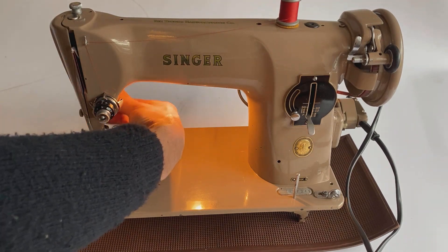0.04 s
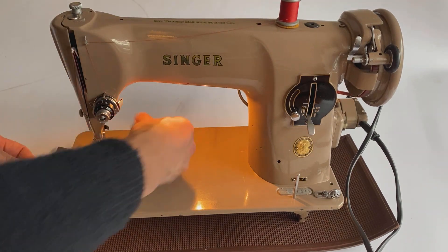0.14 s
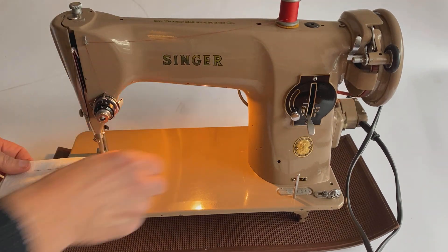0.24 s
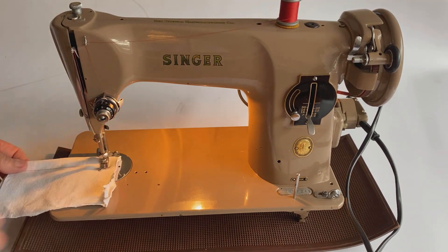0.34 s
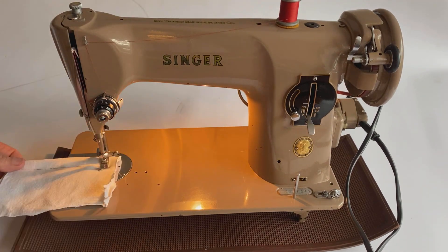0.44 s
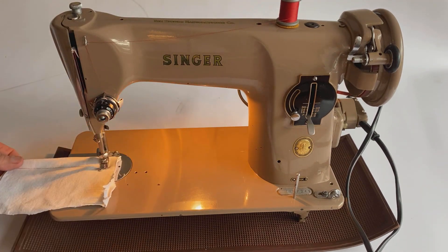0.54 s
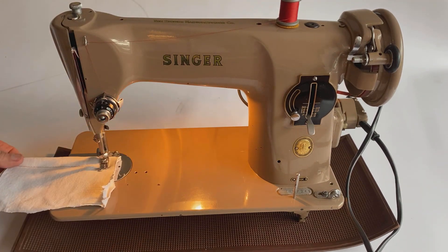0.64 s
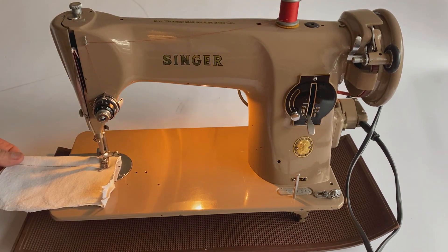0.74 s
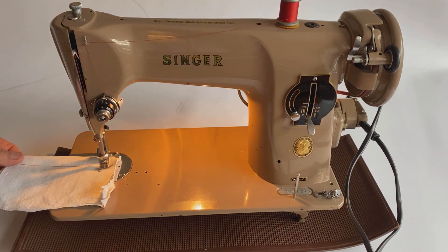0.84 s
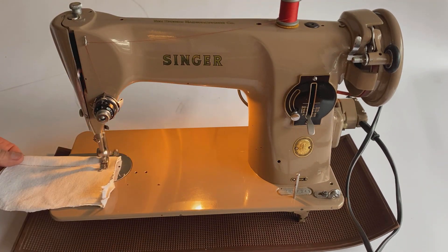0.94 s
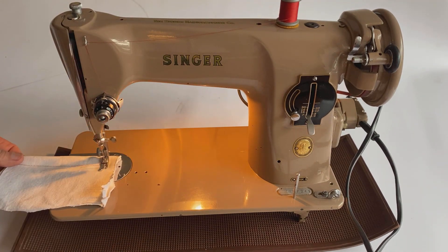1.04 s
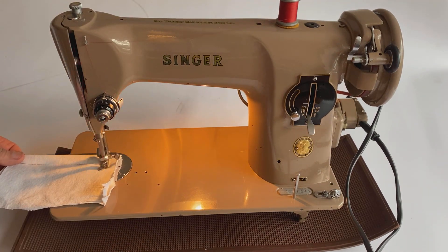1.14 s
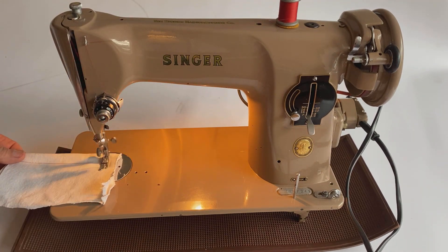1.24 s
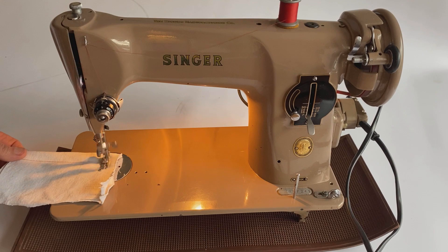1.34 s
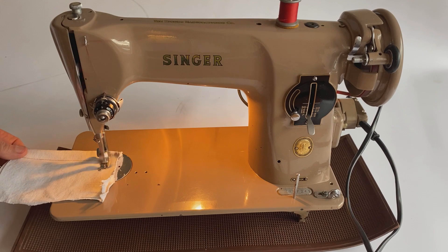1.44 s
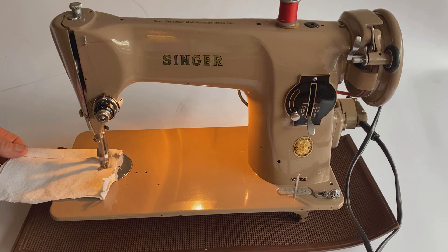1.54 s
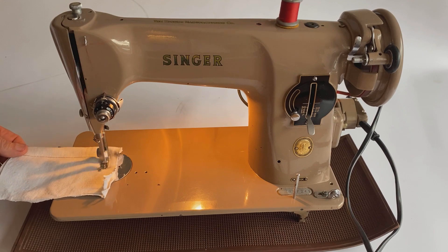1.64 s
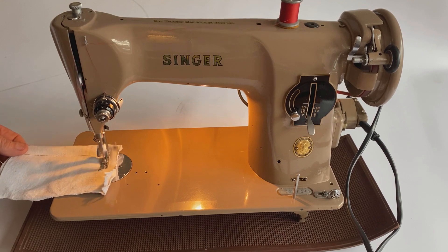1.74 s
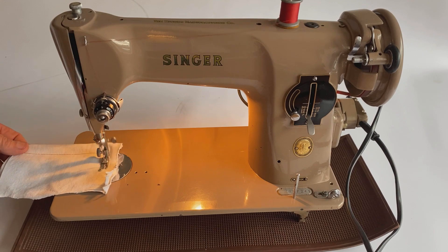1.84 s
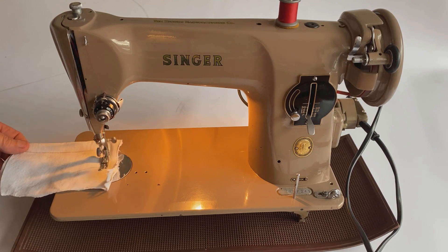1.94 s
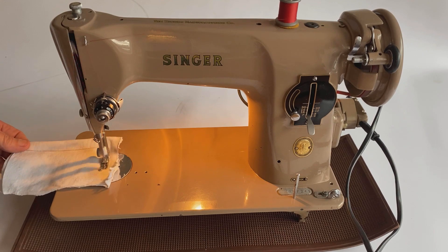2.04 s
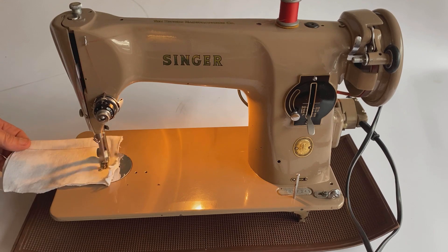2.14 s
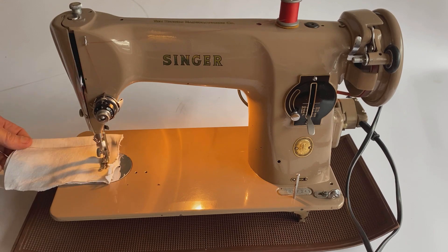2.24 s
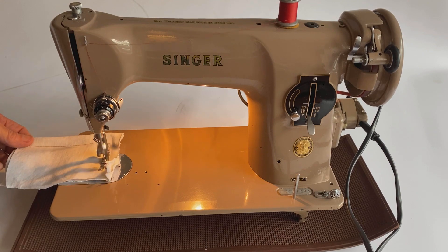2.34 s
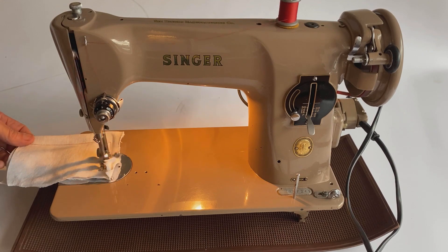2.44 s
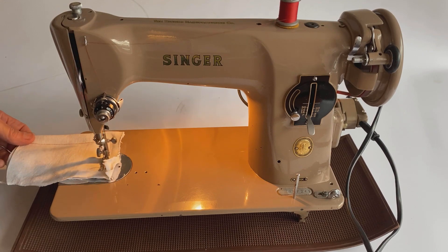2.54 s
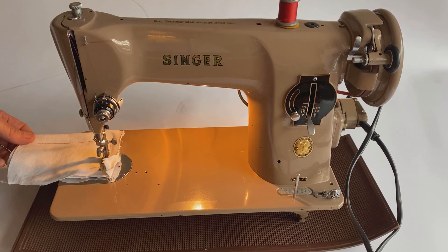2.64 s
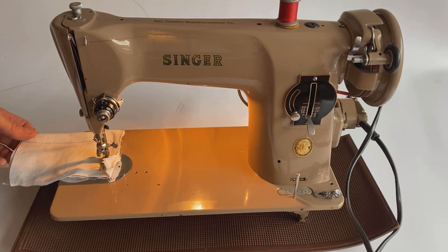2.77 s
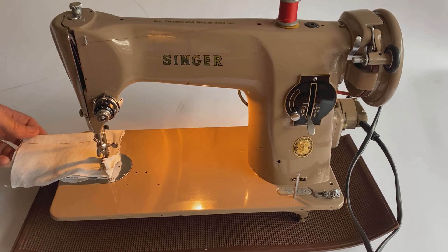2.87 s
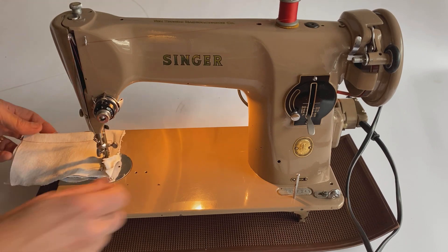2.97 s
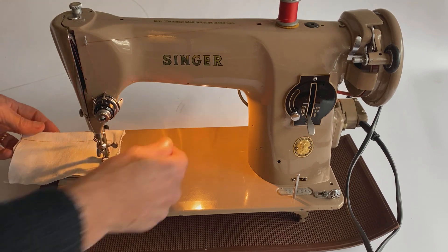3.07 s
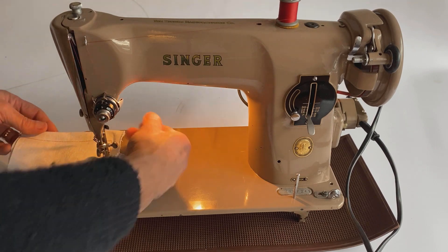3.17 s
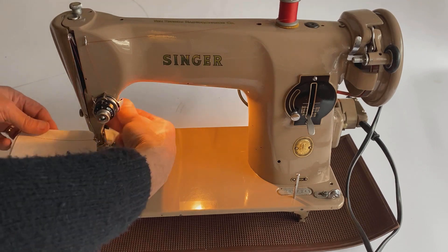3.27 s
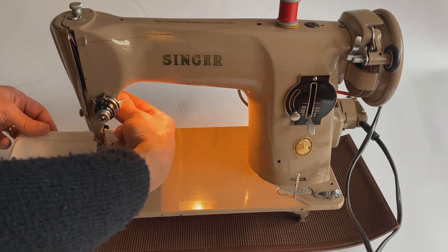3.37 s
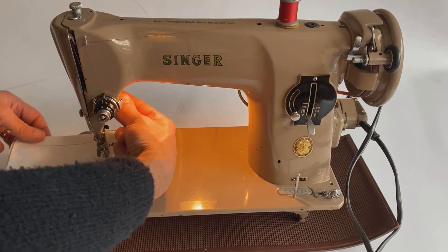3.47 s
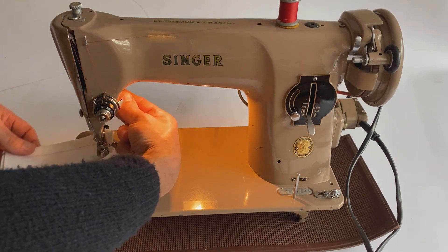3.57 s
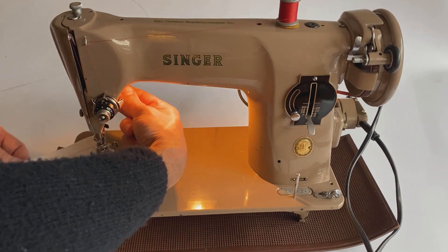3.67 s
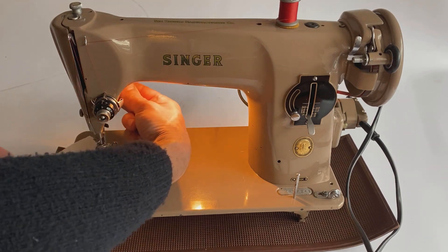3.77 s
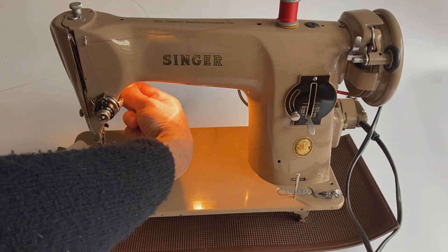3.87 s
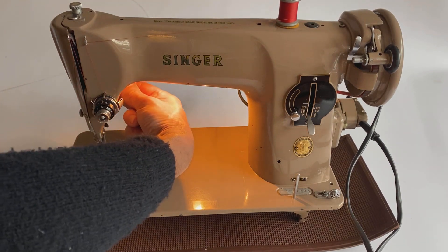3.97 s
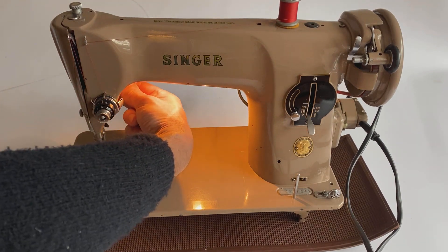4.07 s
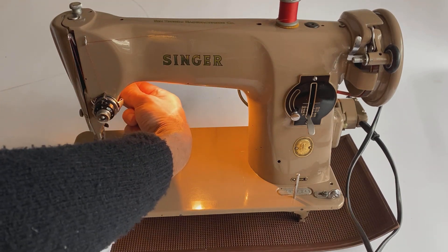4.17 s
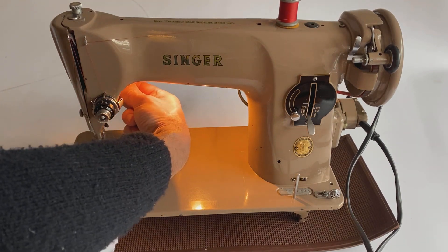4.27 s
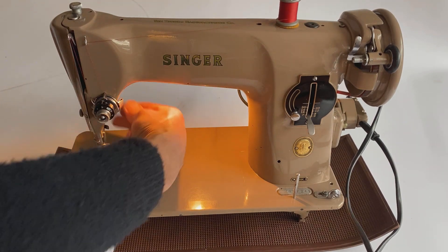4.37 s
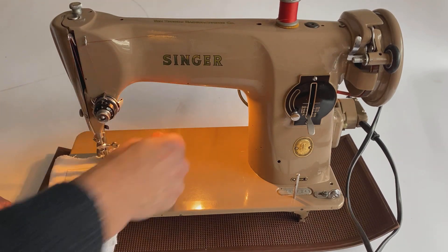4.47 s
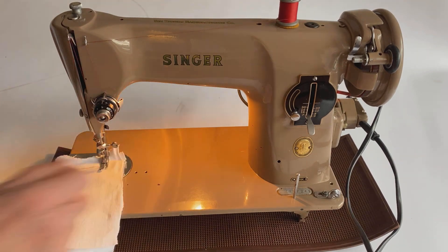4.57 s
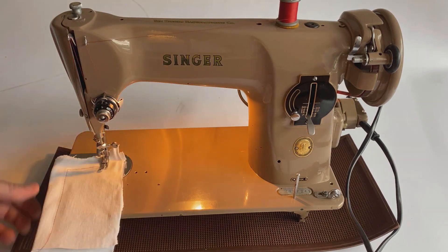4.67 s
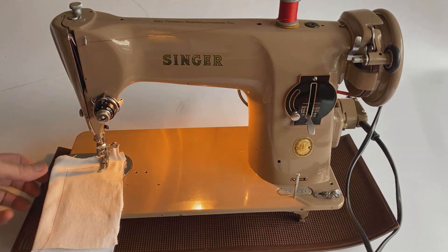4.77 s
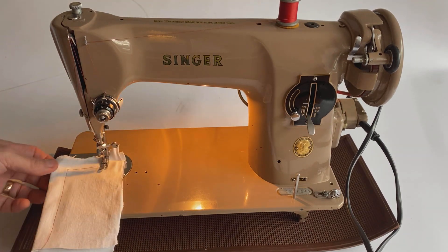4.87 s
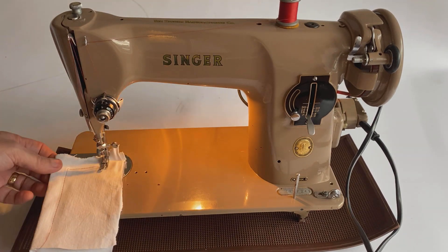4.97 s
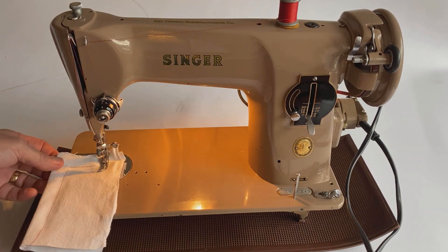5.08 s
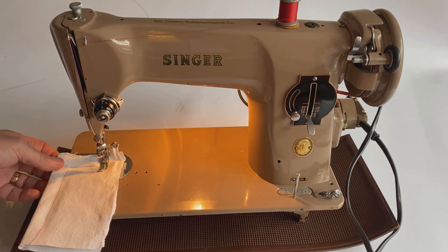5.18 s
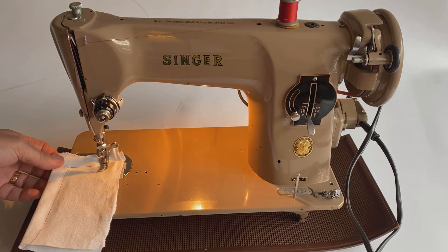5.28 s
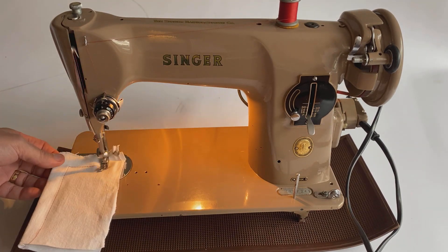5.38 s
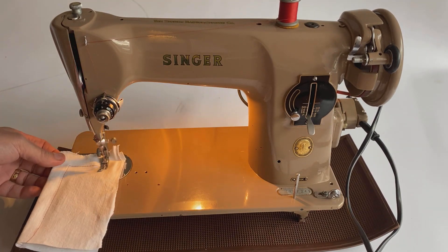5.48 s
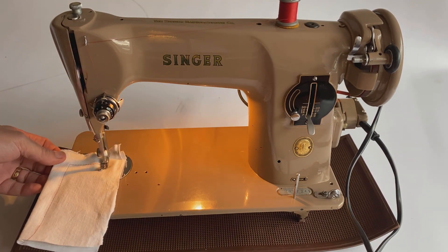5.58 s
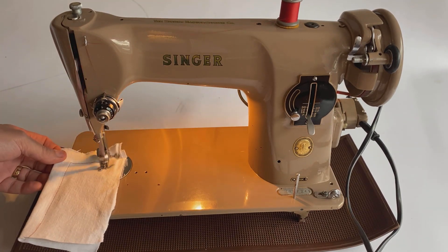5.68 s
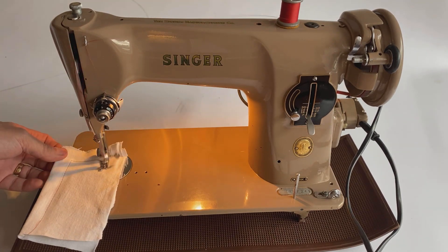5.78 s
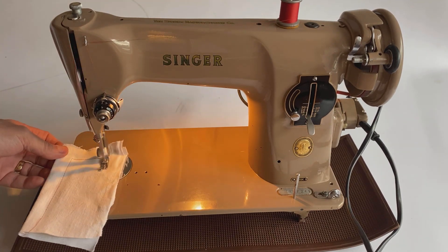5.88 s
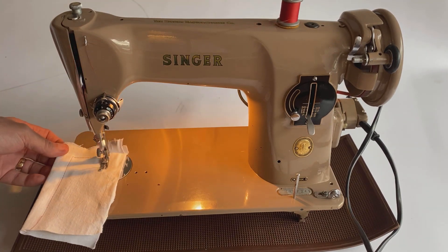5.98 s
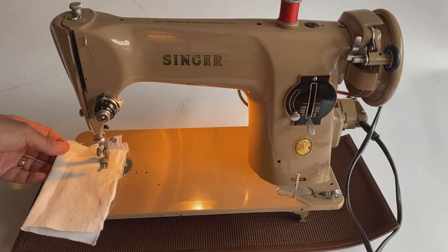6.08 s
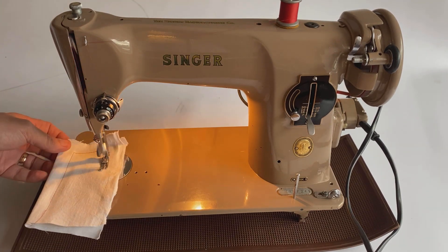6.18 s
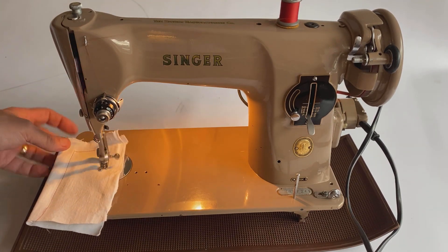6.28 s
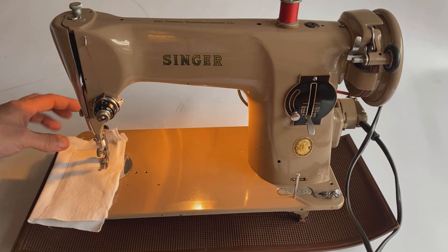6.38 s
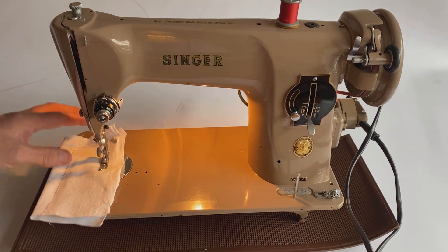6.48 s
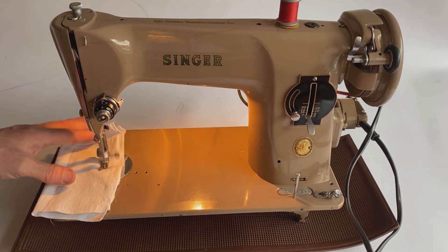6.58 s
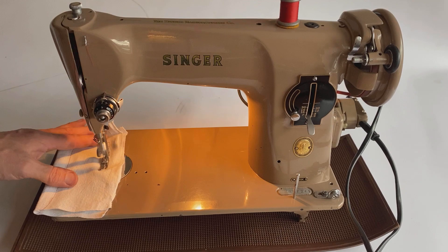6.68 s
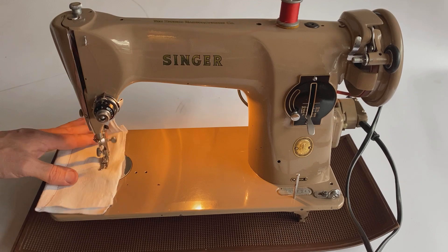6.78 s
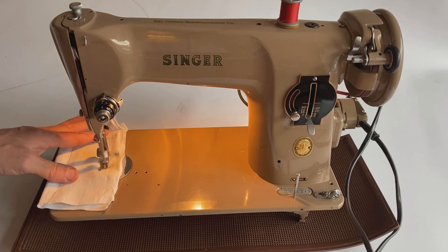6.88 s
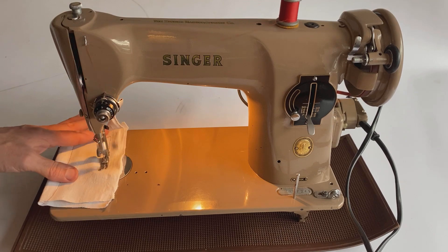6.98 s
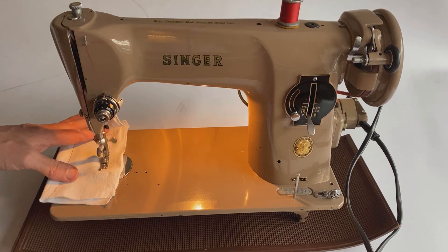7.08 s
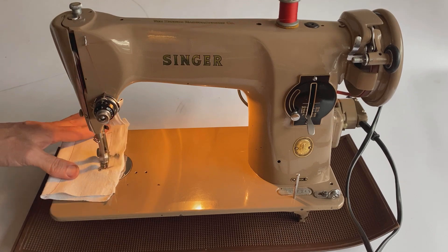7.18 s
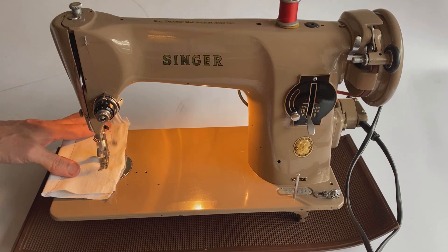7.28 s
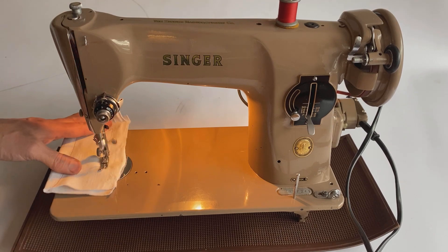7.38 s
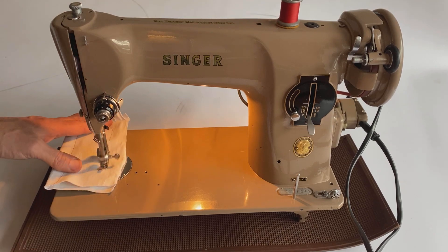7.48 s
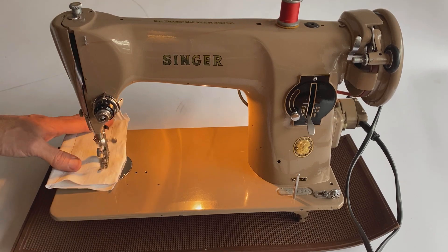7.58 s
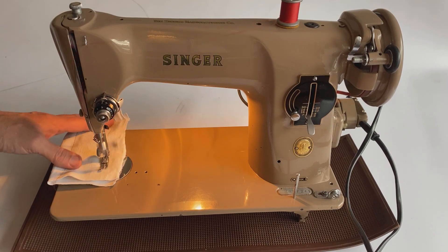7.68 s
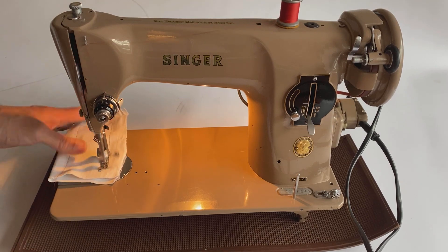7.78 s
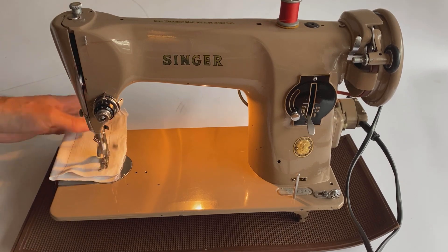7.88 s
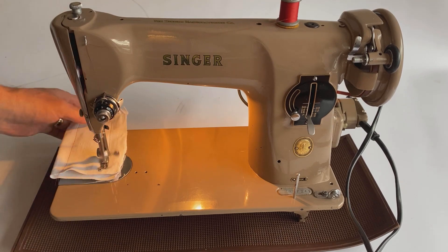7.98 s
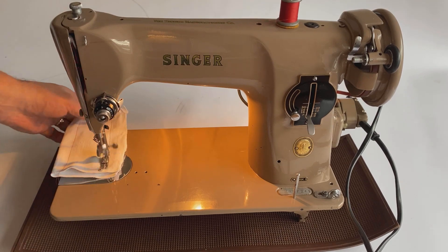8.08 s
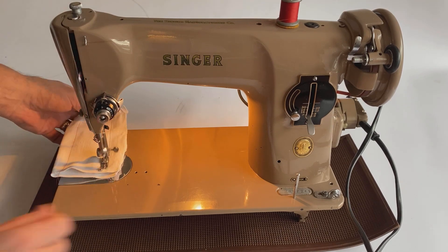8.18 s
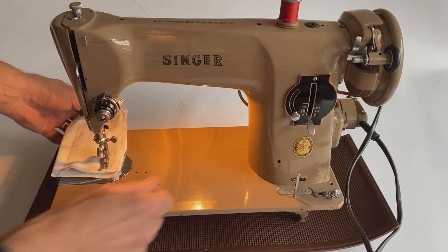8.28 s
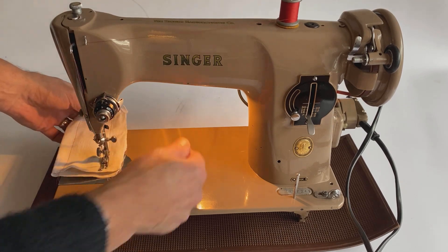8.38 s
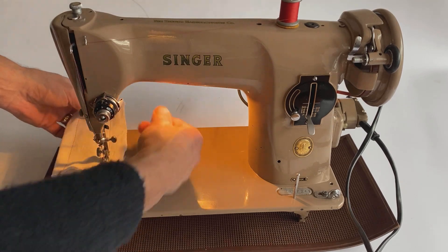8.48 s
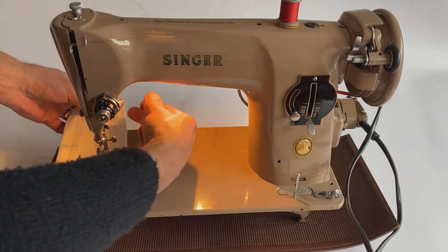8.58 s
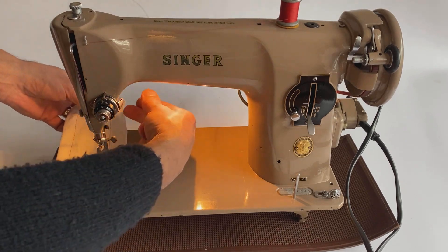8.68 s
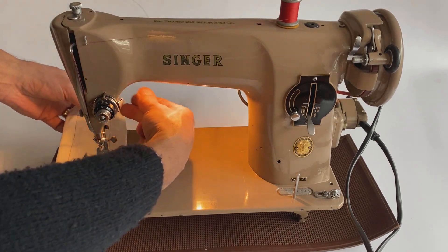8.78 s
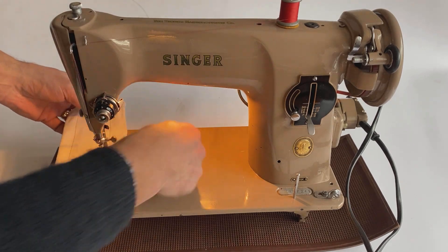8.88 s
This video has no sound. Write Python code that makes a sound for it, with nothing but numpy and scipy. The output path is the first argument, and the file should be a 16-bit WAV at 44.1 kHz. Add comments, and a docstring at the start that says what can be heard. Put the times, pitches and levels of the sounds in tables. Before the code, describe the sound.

Close stereo pickup of a metal sewing machine on a table in a small, slightly live room. Two bursts of about thirteen stitches per second, each starting with a growling motor rise and stopping with a hard switch crack and short coasting slowdown. Between them come near-quiet, soft fabric strokes, light metal taps and a dull pedal click over a faint low drone.

```python
"""An old electric sewing machine sews two short seams on a table in a small room, heard at two close ports.
A hand bumps the machine and the presser foot pings; the foot switch clicks and the motor creeps, then spins up.
At about 13 stitches a second, thread ticks and needle thumps recur with the shaft under a rattle of linkage, a hum
of frame and table and a whirr of brushes; the switch opens and the machine coasts to rest. A hand then works the
presser-foot lever and turns the cloth; a second seam and last strokes of cloth follow. Impacts ring damped modes."""
import sys
import numpy as np
from scipy import signal
from scipy.fft import rfft, irfft, next_fast_len
from scipy.io import wavfile
from scipy.ndimage import uniform_filter1d

SR = 44100
rng = np.random.default_rng(int(sys.argv[2]) if len(sys.argv) > 2 else 0)


def int16_out(signal):
    """Quantize to a 16-bit WAV file."""
    q = np.round(np.clip(np.atleast_2d(signal).T, -1, 1) * 32767)
    wavfile.write(sys.argv[1], SR, q.astype(np.int16))


N = 393372
TIME = np.arange(N) / SR
START_S = .1  # time constant with which the motor reaches creep speed

# one row a seam: (switch on [s], pedal pressed down [s], switch off [s], standstill [s],
# creep rate [stitches/s], top rate [stitches/s], spin-up [s], shaft angle at rest [turns], rattle build-up [s])
SEAMS = [(.83, 1.3576, 2.283, 2.88, 5.807, 12.795, .2787, .556, .26),
         (5.32, 5.605, 7.842, 8.5, 7.312, 13.521, .3604, .611, .08)]
# modes of table and bed under a blow: (frequency [Hz], relative level [dB], t60 [s])
TABLE = [(55.6, -21, 0.1), (70.6, -16, 0.14), (98, -31.5, 0.11), (133.6, -8, 0.32), (141.4, -1, 0.43),
         (178.6, -2, 0.22), (242.5, -7.5, 0.22), (235.6, -6, 0.56), (253.5, -12, 0.42),
         (364.3, -18.5, 0.73)]
# spectrum of rattling metal: (frequency [Hz], relative level [dB])
RATTLE = [(250, -17), (420, -0.5), (520, -3.5), (760, 2.5), (950, 0.5), (1080, 3), (1250, -2), (1450, 6),
          (1800, 2), (2030, 3), (2350, -0.5), (3000, -3), (3400, -5.5), (6800, -6), (10000, -27),
          (16000, -49)]
# spectrum of sliding parts and fizzing cloth: (frequency [Hz], relative level [dB])
HISS = [(1500, -17.5), (4000, -16.5), (7000, 0.5), (9500, 0), (12500, 7.5), (14000, 2.5), (15700, -9)]
# spectrum of thread snaps: (frequency [Hz], relative level [dB])
TICK = [(2000, -11), (4500, 1), (7000, 0), (10000, -0.5), (12000, 2.5), (13500, 8.5), (15500, -13.5)]
# spectrum of rubbing: (frequency [Hz], relative level [dB])
RUB = [(300, 16), (700, 0.5), (1500, 0), (3500, -6.5), (7000, -8.5), (11000, -14.5)]


def gain_of(db):
    """Decibels to amplitude."""
    return 10 ** (np.asarray(db) / 20)


def evened(x):
    """Scales to an rms of 1."""
    return x / np.sqrt(np.mean(x ** 2) + 1e-20)


def read(points, hz):
    """Interpolates a table on a log-frequency axis."""
    f, value = np.transpose(points)
    return np.interp(np.log(hz + 1), np.log(f + 1), value)


def add(mix, s, sound):
    """Superposes a sound on a mix at a time in seconds."""
    part = mix[max(round(s * SR), 0):][:len(sound)]
    part += sound[:len(part)]


def colour(x, spectrum, size=4096):
    """Minimum-phase filter of unit energy: the Hilbert transform of the log gain gives the phase."""
    log_gain = np.log(gain_of(read(spectrum, abs(np.fft.fftfreq(size, 1 / SR)))))
    response = np.exp(np.conj(signal.hilbert(log_gain)))
    taps = np.fft.ifft(response).real[:size // 2]
    return signal.oaconvolve(x, taps / np.linalg.norm(taps))[:len(x)]


def ring(modes, contact_s):
    """Modal decay after a blow, peak 1; a long, soft contact swells slowly and leaves the high modes out."""
    t = np.arange(SR // 2) / SR
    sound = np.zeros(len(t))
    for hz, db, t60 in modes:
        decay = gain_of(db + rng.standard_normal() - 60 * t / t60)  # each blow varies the mode levels
        sound += decay * np.sin(2 * np.pi * hz * t) / (1 + (hz * contact_s) ** 5)
    sound *= 1 - np.exp(-t / contact_s)
    return sound / abs(sound).max()


def burst(decay_s):
    """Noise under an exponential decay: a puff of micro-impacts."""
    t = np.arange(SR // 8) / SR
    return rng.standard_normal(len(t)) * np.exp(-t / decay_s)


def grains(per_s, spread_db):
    """Shot noise: random impacts of uneven size, rms 1."""
    hit, size = rng.random(N) < per_s / SR, rng.standard_normal(N)
    sign = np.sign(rng.standard_normal(N))
    return evened(hit * sign * gain_of(spread_db * np.clip(size, -2, 2)))


def wobble(size):
    """Low-passed noise, rms 1, smoothed twice over the given number of samples."""
    return evened(uniform_filter1d(uniform_filter1d(rng.standard_normal(N), size), size))


def swell(s, length_s):
    """Gaussian rise and fall around a time, peak 1."""
    return np.exp(-(2 * (TIME - s) / length_s) ** 2)


def shaft():
    """Integrates the stitch rate to shaft turns; also gives speed (1 = full), coasting and rattle build-up (0-1)."""
    full_speed = 13  # stitches/s at which the levels of speed-driven parts are given
    coast_power = 1.3  # friction bends the run-down by this power
    speed, turns, coasting, built = np.zeros((4, N))
    for on, pedal, off, stop, creep, top, spin_up_s, angle, build_s in SEAMS:
        powered = np.clip(TIME, on, off)
        rate = creep * (1 - np.exp((on - powered) / START_S))
        rate += (top - creep) * (1 - np.exp(np.minimum(pedal - powered, 0) / spin_up_s))
        rate *= np.clip((stop - TIME) / (stop - off), 0, 1) ** coast_power
        since = TIME >= on
        speed += rate / full_speed
        turns[since] = (np.ceil(turns[-1]) + angle + np.cumsum(rate) / SR)[since]
        coasting[since] = TIME[since] > off
        built[since] = 1 - np.exp((on - TIME[since]) / build_s)
    return speed, turns, uniform_filter1d(coasting, size=1300), built


def passes(turns, speed, angle):
    """Phase crossings: sample numbers at which the turning shaft passes an angle in turns."""
    return np.flatnonzero((np.diff(np.floor(turns - angle)) > 0) & (speed[:-1] > 0))


def driven(speed, coasting, db, power, coast_db):
    """Power law: a part gets louder with speed, and changes level when the drive lets go."""
    return gain_of(db + coast_db * coasting) * speed ** power


def knocking(turns, loose, count=70):
    """Periodic impacts of cams and rods at fixed shaft angles; play in the joints adds loose, random knocks."""
    angles, sizes = rng.random(count), rng.standard_normal(count)
    at = (np.arange(int(turns[-1]))[:, None] + angles).ravel()
    samples = np.minimum(np.searchsorted(turns, at), N - 1)
    knocks = np.zeros(N)
    np.add.at(knocks, samples, np.resize(sizes, len(at)) * rng.uniform(.5, 1.5, len(at)))
    knocks /= np.sqrt(uniform_filter1d(knocks ** 2, SR // 4).clip(1e-5))  # even out the running rms
    return np.sqrt(1 - loose) * knocks + np.sqrt(loose) * grains(per_s=3000, spread_db=0.5)


def linkage(speed, turns, coasting, built, throb_db=0.53):
    """Source and filter: knocks of the linkage rattle the casting and rumble in the frame."""
    # spectrum of the frame: (frequency [Hz], relative level [dB])
    rumble_spectrum = [(25, -45.5), (45, -28.5), (80, -15.5), (101, 2), (116, -12), (141, 8.5),
                       (165, -15.5), (205, -2.5), (240, -5), (290, -4.5), (420, -23.5), (700, -34),
                       (3000, -59)]
    force = built * driven(speed, coasting, db=-36.5, power=1.0, coast_db=-6.0)
    throb = gain_of(throb_db * np.cos(2 * np.pi * turns))
    rattle = colour(knocking(turns, loose=0.72) * force * throb, RATTLE)
    frame_force = driven(speed, coasting, db=-42.5, power=0.94, coast_db=2.5)
    return rattle + colour(knocking(turns, loose=0.37) * frame_force, rumble_spectrum)


def play(speed, turns, coasting, built, throb_db=4, angle=0.54):
    """Shaft-modulated shot noise: loose joints clack and thread fibres crackle, mostly in one part of a stitch."""
    throb = built * gain_of(throb_db * np.cos(2 * np.pi * (turns - angle)))
    clacks = grains(per_s=220, spread_db=5) * driven(speed, coasting, db=-47.0, power=2.4, coast_db=1.5)
    crackle = grains(per_s=150, spread_db=3.0) * driven(speed, coasting, db=-51, power=2.5, coast_db=-7.0)
    return colour(clacks * throb, RATTLE) + colour(crackle * throb, TICK)


def clatter(speed, turns, coasting, built, swing_db=4, detune=.06, count=4):
    """Impact excitation: loose parts ring at random, favouring an own shaft angle; contact point shifts pitch."""
    # one mode a loose part: (frequency [Hz], relative level [dB], t60 [s])
    parts = [(685, -3, 0.039), (788, -5, 0.054), (1077, -4.5, 0.036), (1413, -1, 0.053), (1635, -2, 0.028),
             (1745, -5.5, .018), (2018, -2, .035), (2150, -3, 0.012), (2617, -1.5, 0.037),
             (2876, -4.5, .025)]
    force = built * driven(speed, coasting, db=-47, power=1.0, coast_db=-2.5)
    out = np.zeros(N)
    t = np.arange(SR // 20) / SR
    shifts = 1 + detune * np.linspace(-1, 1, count)[:, None]
    for hz, db, t60 in parts:
        impacts = force * grains(per_s=45, spread_db=2.5)
        hits = impacts * gain_of(db + swing_db * np.cos(2 * np.pi * (turns - rng.random())))
        modes = gain_of(-60 * t / t60) * np.sin(2 * np.pi * hz * shifts * t)
        modes /= np.linalg.norm(modes[0])
        contact = rng.integers(0, count, N)
        for at in np.flatnonzero(hits):
            add(out, TIME[at], hits[at] * modes[contact[at]])
    return out


def needle(speed, turns, thump_db=-30.5, power=1.8, spread_db=3.5, early_s=0.00098):
    """Modal impact: once a turn the needle bar reverses and thumps the table, harder at speed."""
    # the needle punches a thick fold and sets the level of the nearest thump: (time [s], level [dB])
    punches = [(1.18, -37), (1.49, -24), (1.6, -21.5), (1.87, -20.5), (2.2, -22), (2.49, -26), (5.83, -23),
               (6.26, -20.5), (6.34, -20.5), (6.65, -21.5), (6.88, -21.5), (7.33, -18), (7.4, -24),
               (7.62, -22), (7.92, -25), (8.15, -30.5)]
    at = passes(turns, speed, angle=0)
    blows = gain_of(thump_db + spread_db * rng.standard_normal(len(at))) * speed[at] ** power
    for s, db in punches:
        blows[np.argmin(abs(TIME[at] - s))] = gain_of(db)
    out = np.zeros(N)
    for s, blow in zip(TIME[at], blows):
        add(out, s - early_s, blow * ring(TABLE, contact_s=0.0025))
    return out


def thread(speed, turns, angle, tick_db, spread_db, tick_s, power=0.66):
    """Phase-locked noise bursts: the thread snaps once a turn at a shaft angle in turns."""
    at, out = passes(turns, speed, angle), np.zeros(N)
    sizes = gain_of(tick_db + spread_db * rng.standard_normal(len(at))) * speed[at] ** power
    t = np.arange(-SR // 40, SR // 40) / SR
    envelope = np.exp(-abs(t) / tick_s)  # rises and falls alike
    for s, size in zip(TIME[at], sizes):
        add(out, s + t[0], size * rng.laplace(0, .5, len(t)) * envelope)
    return colour(out, TICK)


def bright_ticks():
    """Filtered transients: brief bright snaps of the thread."""
    # the loudest thread ticks: (time [s], level [dB])
    loud_ticks = [(1.115, -31), (1.304, -26), (1.453, -22), (1.565, -26), (1.664, -23), (2.178, -22),
                  (6.553, -21)]
    out = np.zeros(N)
    for s, db in loud_ticks:
        add(out, s, gain_of(db) * burst(decay_s=.0016))
    return colour(out, TICK)


def hum(speed, turns, coasting, scatter=1.01, count=160):
    """Forced vibration: harmonics of the stitch rate glide through the resonances of the frame."""
    # frame and table as the shaft shakes them: (frequency [Hz], relative level [dB])
    frame_response = [(25, -30), (54, -9.5), (68, -28.5), (105, -23), (122, -5), (136, 5.5), (149, 1.5),
                      (161, -11.5), (176, -11.5), (190, -10), (203, -1), (216, -15.5), (231, 2), (243, 2),
                      (257, -14), (270, -8), (290, -19.5), (332, -19.5), (351, -10), (375, -23.5),
                      (600, -27), (1200, -62.5)]
    harmonics = np.exp(1j * scatter * rng.standard_normal(count))  # equal strengths, scattered phases
    push = evened(irfft(np.append(0, harmonics), 4096))
    force = np.interp(turns, np.arange(len(push)) / len(push), push, period=1)
    force *= driven(speed, coasting, db=-43.0, power=1.96, coast_db=-3.0)
    return colour(force, frame_response, size=16384)


def unbalance(speed, turns):
    """Rotating unbalance: motor and pulleys shake the frame with the square of the speed."""
    # motor and belt vibration: (cycles per stitch, rms level at full speed [dB])
    orders = [(5.551, -44), (27.75, -53.5), (33.1, -57.5), (42, -61), (55.5, -63)]
    shake = np.zeros(N)
    for k, db in orders:
        shake += gain_of(db) * np.sqrt(2) * np.sin(2 * np.pi * (k * turns + rng.random()))
    return speed ** 2 * shake


def motor(speed, coasting, built, flutter_db=2.07, chatter_db=-53, chatter_speed=0.15):
    """Friction noise: brushes whirr, higher at speed, and chatter near rest; belt and bearings hiss."""
    # brushes on the commutator: (frequency [Hz], relative level [dB])
    whirr_spectrum = [(1500, -41.5), (2300, -13), (2460, 0), (2590, 1.5), (2760, -7), (2860, 1),
                      (2960, -6.5), (3300, -16.5), (6000, -35)]
    # the whirr reaches higher near full speed: (frequency [Hz], relative level [dB])
    fast_spectrum = [(2500, -33.5), (2780, -24.5), (2860, -3), (2940, -4), (3030, -0.5), (3140, -5.5),
                     (3330, -17.5), (6000, -39.5)]
    # chattering brushes ring the motor case near standstill: (frequency [Hz], relative level [dB])
    chatter_spectrum = [(1250, -46), (1420, -20), (1560, -33), (1930, -28), (2040, -4), (2160, -13),
                        (2480, -6), (2620, 2), (2730, -8), (2850, -2), (3050, -8.5), (3350, -14),
                        (6000, -23)]
    # the motor case buzzes on the way up to speed: (middle [s], length [s], level before halving [dB])
    buzzes = [(1.447, 0.091, -38), (1.64, 0.12, -37.5), (5.526, 0.058, -34.5), (5.776, 0.19, -43)]
    # the hiss flares or dips briefly as a seam starts: (middle [s], length [s], change [dB])
    hiss_swings = [(0.855, 0.044, 7), (5.466, 0.05, -16)]
    buzz = sum(gain_of(db) * swell(s, length_s) for s, length_s, db in buzzes) / 2
    brushes = built * driven(speed, coasting, db=-47.5, power=0.41, coast_db=-12.5) + buzz
    whirr = colour(grains(per_s=1400, spread_db=4.5) * brushes, whirr_spectrum)
    fast = driven(speed, coasting, db=-48.5, power=3.0, coast_db=-2.5)
    whirr += colour(grains(per_s=1300, spread_db=0.5) * fast, fast_spectrum)
    slow = speed / chatter_speed
    near_rest = coasting * slow * np.exp((1 - slow ** 2) / 2)  # strongest at chatter_speed
    chatter = colour(grains(per_s=910, spread_db=1.0) * gain_of(chatter_db) * near_rest, chatter_spectrum)
    swing_db = sum(db * swell(s, length_s) for s, length_s, db in hiss_swings)
    sliding = driven(speed, coasting, db=-41.5, power=0.71, coast_db=3.5)
    sliding *= gain_of(flutter_db * wobble(size=160) + swing_db)
    return whirr + chatter + colour(grains(per_s=6200, spread_db=2.5) * sliding, HISS)


def growl(speed, turns, coasting, db=-45.0, slow_db=5, coast_db=-2, knee_speed=.27, rough_db=-8):
    """Source and filter: armature harmonics glide through the housing's resonance, favoured at low speed."""
    # resonance of the housing: (frequency [Hz], relative level [dB])
    housing = [(150, -26), (240, -9.5), (305, -11.5), (345, 6.5), (375, -2), (410, -7), (450, -10.5),
               (520, -14), (900, -28.5), (3000, -60)]
    per_stitch = 5.551  # armature turns per stitch
    harmonics = sum(np.cos(2 * np.pi * (k * per_stitch * turns + rng.random())) for k in range(3, 18))
    tones = evened(colour(harmonics * (speed > 0), housing))
    drive = tones / 2 + gain_of(rough_db) * colour(knocking(turns, loose=0.8), housing)
    level = gain_of(db + slow_db * (1 - speed) + coast_db * coasting)
    return drive * level * speed ** 2 / (speed ** 2 + knee_speed ** 2)


def strain(turns, creep_db=-7, gears_db=-43, bite_s=.04, ease_s=0.38):
    """Load-dependent excitation: the pulling motor hums and gears grind; both fade as it reaches its speed."""
    # magnetic hum of the loaded motor: (frequency [Hz], rms level under full load [dB])
    mains_hum = [(100, -49), (200, -58), (300, -59.5), (400, -57.5), (500, -57.5)]
    # gears pressed together while the motor pulls: (frequency [Hz], relative level [dB])
    gear_spectrum = [(350, -25.5), (560, -5.5), (680, 0.5), (770, -4.5), (900, -6), (1100, 4), (1250, -8),
                     (1430, -0.5), (1800, -7.5), (2600, -1.5), (3200, -14), (7000, -33)]
    load, pull = np.zeros((2, N))
    for on, pedal, off, *_ in SEAMS:
        since = np.maximum(TIME - pedal, 0)
        onset = 1 - np.exp(-np.maximum(TIME - on, 0) / START_S)
        slip = onset * np.exp(-(since / ease_s) ** 2) * (TIME < off)
        load += slip
        pull += slip * (gain_of(creep_db) + 1 - np.exp(-since / bite_s))
    drift = 0.66 * wobble(size=2500)  # phase of the lowest tone [rad]
    mains = np.zeros(N)
    for hz, db in mains_hum:
        phase = 2 * np.pi * hz * TIME + drift * hz / mains_hum[0][0]
        mains += gain_of(db) * np.sqrt(2) * np.sin(phase)
    grind = knocking(turns, loose=0.85) * pull * gain_of(gears_db)
    return load * mains + colour(grind, gear_spectrum)


def clicks(chatter_db=-12, clatter_db=-3):
    """Impulsive excitation: snaps with a brief chatter, their share sent to the room, and the ringing casting."""
    # switch and metal parts snap: (time [s], crack level [dB], knock on the casting [dB], crack to room [dB])
    snap_events = [(0.6845, -41, -62, 0), (0.6872, -24, -50, -2), (0.817, -34, -51, 2),
                   (0.832, -26, -36, 8), (0.841, -21, -34, -3), (2.2826, -11.5, -20.5, -18),
                   (2.4865, -19, -53, -18), (2.6559, -23, -50, -2), (2.6734, -25, -49, -5),
                   (5.2119, -29, -40, -7), (5.2795, -36, -44, -6), (5.3144, -29, -51, -6),
                   (7.8413, -0.5, -22, -8), (7.869, -16, -30, -9), (8.1116, -28, -47, -4),
                   (8.4184, -33, -53, -1)]
    # modes of the iron casting: (frequency [Hz], relative level [dB], t60 [s])
    casting = [(680, -12, 0.044), (675, 5.5, 0.086), (705.4, 4.5, 0.034), (750, -0.5, 0.069),
               (1027, -4, 0.066), (1100, 0, 0.073), (1420, -11, 0.03), (1770, -21.5, 0.03),
               (1920, 2.5, 0.059), (2900, -5, 0.053), (2680, -19.5, .04)]
    # spectrum of a snap: (frequency [Hz], relative level [dB])
    crack_spectrum = [(200, -15), (700, -8.5), (1100, -6), (2500, -8.5), (3500, 2), (4300, 1), (5500, -5),
                      (8000, -14.5), (12000, -31), (16000, -28.5)]
    snaps, sent, knocks, loose_metal = np.zeros((4, N))
    for s, snap_db, body_db, room_db in snap_events:
        snap = gain_of(chatter_db) * burst(decay_s=0.0015)
        add(snap, .0008, np.ones(1))
        add(snaps, s, gain_of(snap_db) * snap)
        add(sent, s, gain_of(snap_db + room_db) * snap)
        add(knocks, s, gain_of(body_db) * ring(casting, contact_s=0.00022))
        add(loose_metal, s, gain_of(body_db + clatter_db) * burst(decay_s=0.0066))
    body = knocks + colour(loose_metal, RATTLE)
    return colour(snaps, crack_spectrum), colour(sent, crack_spectrum), body


def foot_switch():
    """Free vibration: the spring of the foot switch pings as the contact closes and opens."""
    # the switch closes and opens: (time [s], peak level [dB])
    switchings = [(0.6887, -33), (0.8414, -18.5), (2.2828, -19.5), (7.842, -17)]
    # modes of its spring: (frequency [Hz], relative level [dB], t60 [s])
    switch_spring = [(4230, 7.5, 0.02), (4500, -3.5, 0.0052), (3600, -8.5, 0.012), (5160, -8, 0.0086)]
    out = np.zeros(N)
    for s, db in switchings:
        add(out, s, gain_of(db) * ring(switch_spring, contact_s=.0001))
    return out


def bumps_and_presser_foot(tap_db=-15):
    """Contact time shapes modal impact: hand, lever and foot pedal thump, and the sprung presser foot lands."""
    # hand and lever bump the machine; at 0.693 s the low thump of the foot pedal:
    # (time [s], peak level [dB], contact time [s])
    bumps = [(0.121, -40.5, 0.0022), (0.199, -43.5, 0.0014), (0.693, -43, 0.0012), (3.402, -39.5, 0.00326),
             (4.423, -34, 0.0012), (4.954, -38, 0.015), (4.986, -41.5, 0.02)]
    # the presser foot lands on the plate and its spring rings: (time [s], peak level [dB])
    pings = [(0.1961, -31.5), (0.259, -44), (4.4732, -36.5)]
    # modes of the presser-foot spring: (frequency [Hz], relative level [dB], t60 [s])
    foot_spring = [(638, -11.5, 0.1), (980, -17, 0.068), (951, 1, 0.073), (1987, -4, 0.027),
                   (3150, -5, 0.0071), (4950, -11, 0.014), (7000, -6, 0.02)]
    out, taps = np.zeros((2, N))
    for s, db, contact_s in bumps:
        add(out, s, gain_of(db) * ring(TABLE, contact_s))
    for s, db in pings:
        add(out, s, gain_of(db) * ring(foot_spring, contact_s=0.00013))
        add(taps, s, gain_of(db + tap_db) * burst(decay_s=0.028))
    return out + colour(taps, RUB)


def lever_and_pedal(scrape_s=.02, touch_db=9, touch_s=.0022):
    """Selective modal excitation: where a part is struck decides which modes ring; a short scrape follows."""
    # lever and small parts are tapped; at 0.689 and 5.212 s the foot pedal clicks dully:
    # (time [s], peak level [dB], middle of the excited modes [Hz], their spread [octaves],
    # scrape reference level [dB])
    tap_events = [(0.6888, -37, 1150, 0.29, -48), (3.342, -51, 7160, .15, -75), (3.345, -51, 640, .2, -81),
                  (3.3947, -43.5, 1200, 0.44, -63), (3.658, -51, 2400, 1.1, -65),
                  (4.957, -67, 2200, .24, -83), (4.993, -55, 1140, .45, -85), (5.097, -45, 1160, 1.2, -69),
                  (5.2118, -26.5, 1330, 0.45, -52), (5.2803, -30, 910, 0.5, -53),
                  (5.326, -37, 657, 0.21, -57)]
    # modes of the struck parts: (frequency [Hz], relative level [dB], t60 [s])
    part_modes = [(667, 9, .1), (757, 8, 0.062), (940, 0, 0.038), (1110, 4.5, 0.027), (1510, 0.5, .03),
                  (1860, -2.5, 0.028), (2226, 2, .045), (2920, -12, .025), (3600, 0, .025),
                  (7030, -10, .02), (7700, -6, .015)]
    out, scrapes = np.zeros((2, N))
    for s, db, middle_hz, octaves, scrape_db in tap_events:
        modes = []
        for hz, mode_db, t60 in part_modes:
            distance = np.log2(hz / middle_hz) / octaves
            modes.append((hz, mode_db - 10 * distance ** 2 / 2, t60))
        add(out, s, gain_of(db) * ring(modes, contact_s=.0001))
        scrape = burst(scrape_s) / 2 + gain_of(touch_db) * burst(touch_s)
        add(scrapes, s, gain_of(scrape_db) * scrape)
    return out + colour(scrapes, RATTLE)


def cloth_and_spark():
    """Stick-slip friction: fibres catch and slip as cloth is turned; like noise serves a switch-on spark."""
    # strokes of hand and cloth, and at 5.382 s a short burst of hiss as the motor switches on:
    # (middle [s], rub level [dB], fizz level [dB], length [s])
    strokes = [(0.094, -59, -85, 0.049), (0.212, -63, -76, 0.16), (0.375, -71.5, -74.5, 0.29),
               (3.224, -69.5, -72, 0.26), (3.718, -71, -84.5, 0.19), (3.967, -77.5, -87, 0.29),
               (4.205, -69, -95, 0.067), (4.42, -59, -90, 0.061), (4.538, -74, -80, 0.16),
               (4.648, -75, -76.5, 0.18), (4.97, -69, -92, 0.063), (5.032, -77, -76, 0.043),
               (5.177, -67.5, -102, 0.28), (5.382, -36.5, -42, 0.029), (8.559, -71.5, -71, 0.24),
               (8.91, -82, -85, .08)]
    rub, fizz = np.zeros((2, N))
    for s, rub_db, fizz_db, length_s in strokes:
        envelope = swell(s, length_s)
        rub += gain_of(rub_db) * envelope
        fizz += gain_of(fizz_db) * envelope
    rubbing = colour(grains(per_s=6000, spread_db=7.5) * rub, RUB)
    return rubbing + colour(grains(per_s=3600, spread_db=4.0) * fizz, HISS)


def background(drone_hz=54, drone_db=-61, air_db=-61.0):
    """Phase-modulated tone and filtered noise: a low wavering drone and faint air in the room."""
    # spectrum of the air: (frequency [Hz], relative level [dB])
    air_spectrum = [(20, -34.5), (38, -17.5), (54, -0.5), (75, -12), (130, -19), (200, -12), (280, -26),
                    (450, -40.5), (1000, -46), (4000, -50), (15000, -49.5)]
    phase = 2 * np.pi * drone_hz * TIME + 0.67 * wobble(size=5000)
    drone = gain_of(drone_db) * np.sqrt(2) * np.sin(phase)
    return drone + gain_of(air_db) * colour(rng.standard_normal(N), air_spectrum)


def nearby(x, above_hz=350, below_hz=6500, last_s=.012, count=9):
    """Early reflections: bed, arm and table return the shorter waves at once, differently to each port."""
    taps = np.zeros((2, SR // 20))
    for port in taps:
        delays = (rng.uniform(.1, 1, count) * last_s * SR).astype(int)
        port[delays] = rng.choice([-1, 1], count) / np.sqrt(count)
    band = signal.butter(2, [above_hz, below_hz], "bandpass", fs=SR, output="sos")
    return signal.oaconvolve(signal.sosfilt(band, x)[None], taps, axes=1)[:, :N]


def room(x, shared_hz=230):
    """Diffuse reverberation: each band dies at its own rate; long waves reach both ports alike."""
    # reverberation time: (frequency [Hz], t60 [s])
    decay_times = [(150, 0.34), (530, 0.27), (1400, 0.26), (3700, 0.24), (10000, 0.075)]
    # strength of the reverberation: (frequency [Hz], relative level [dB])
    echo_spectrum = [(150, 1), (260, 3), (500, 5.5), (1400, -5), (2800, 4.5), (5500, 0), (8000, -16),
                     (13000, -21)]
    hz, t, z = signal.stft(rng.standard_normal((2, SR * 3 // 4)), SR, nperseg=512)
    same = 1 / (1 + (hz[:, None] / shared_hz) ** 4)  # coherence of the two ports
    z = np.array([z[0], same * z[0] + np.sqrt(1 - same ** 2) * z[1]])
    t60 = read(decay_times, hz)[:, None]
    z *= gain_of(read(echo_spectrum, hz)[:, None] - 60 * t / t60)
    z *= np.sqrt(2 * np.log(1000) / (t60 * SR))  # equal energy whatever the decay time
    tail = signal.istft(z, SR, nperseg=512)[1]
    tail *= np.clip(np.arange(tail.shape[1]) / SR / 0.0098, 0, 1) ** 2  # reflections set in gradually
    return signal.fftconvolve(x[None], tail, axes=1)[:, :N]


def ports(x):
    """Interport phase difference: direct sound reaches the two ports out of step."""
    # lead of the left port over the right: (frequency [Hz], phase [rad])
    port_phase = [(100, 0), (700, -.4), (1800, -.2), (2700, -1.3), (3600, -.3), (5500, -1), (6500, 0),
                  (9150, 3.14), (11800, 6.28), (12600, 6.28), (15100, 9.42)]
    size = next_fast_len(N + 4096)
    lead = np.interp(np.fft.rfftfreq(size, 1 / SR), *np.transpose(port_phase))
    return irfft(rfft(x, size) * np.exp(.5j * np.array([lead, -lead])), size)[:, :N]


def balanced(pair):
    """Interport level difference: the table booms to the left, the motor whirrs to the right."""
    # the machine at the two ports: (frequency [Hz], left minus right [dB])
    balance = [(50, .5), (140, 1.5), (260, 4.5), (380, 3), (550, -1), (1500, -1.3), (2100, 1), (2800, -6.5),
               (3400, -.5), (5200, -3.5), (7000, 0), (15000, 0)]
    size = next_fast_len(N + 4096)
    tilt_db = read(balance, np.fft.rfftfreq(size, 1 / SR)) / 2
    return irfft(rfft(pair, size) * gain_of([tilt_db, -tilt_db]), size)[:, :N]


def scene():
    """Superposition of machine, clicks and handling, direct and reflected in one room."""
    speed, turns, coasting, built = shaft()
    running = linkage(speed, turns, coasting, built)
    running += play(speed, turns, coasting, built)
    running += clatter(speed, turns, coasting, built)
    running += motor(speed, coasting, built) + growl(speed, turns, coasting) + strain(turns)
    # the thread snaps sharply off the hook, then softly as it is drawn tight
    ticks = thread(speed, turns, angle=0.53, tick_db=-38.0, spread_db=0.5, tick_s=0.0014)
    ticks += thread(speed, turns, angle=.66, tick_db=-30, spread_db=1.5, tick_s=0.0067)
    machine = running + needle(speed, turns) + ticks + bright_ticks() + cloth_and_spark()
    tones = hum(speed, turns, coasting) + unbalance(speed, turns)
    snaps, sent, knocks = clicks()
    switch = foot_switch()
    handling = bumps_and_presser_foot() + lever_and_pedal()
    air = background()
    to_room = gain_of(-3.0) * (machine + air) + sent + gain_of(-21) * switch
    to_room += gain_of(4.5) * knocks + gain_of(-2.0) * handling
    # snaps, switch and knocks reach both ports in step
    pair = ports(machine + tones + handling) + snaps + switch + knocks
    pair += room(to_room) + gain_of(-6.5) * nearby(machine)
    return balanced(pair) + ports(air)


def record(dry):
    """Band limitation: a high-pass at 34 Hz and a steep low-pass at 15750 Hz."""
    low_cut = signal.butter(4, 34, "highpass", fs=SR, output="sos")
    band_limit = signal.firwin(511, 15750, window=("kaiser", 9), fs=SR)
    return signal.oaconvolve(signal.sosfilt(low_cut, dry), band_limit[None], "same")


dry = scene()
out = record(dry)
int16_out(out)
```